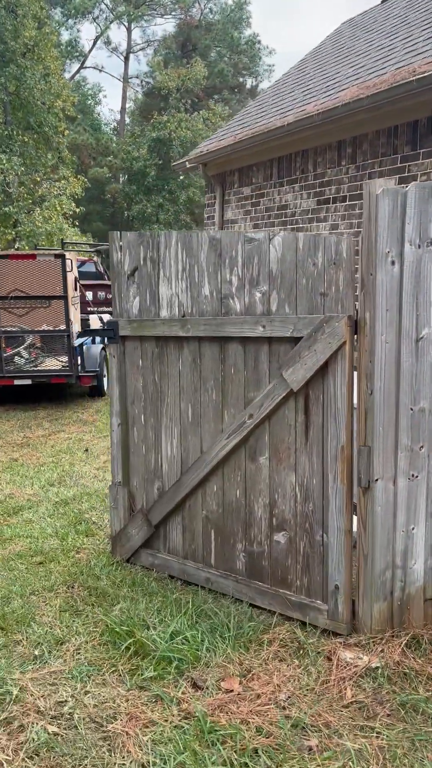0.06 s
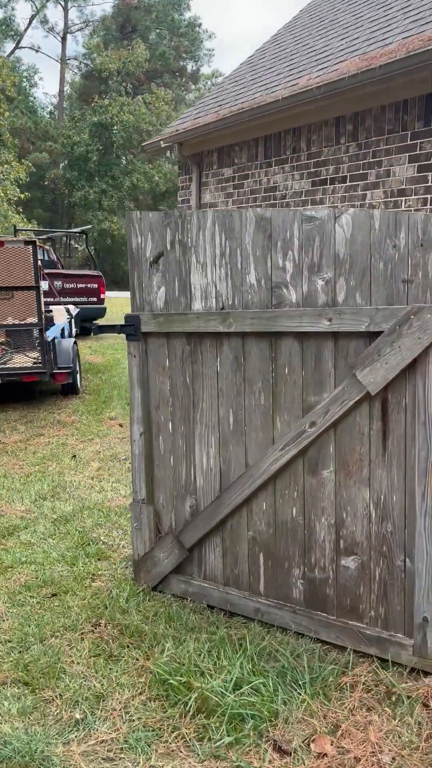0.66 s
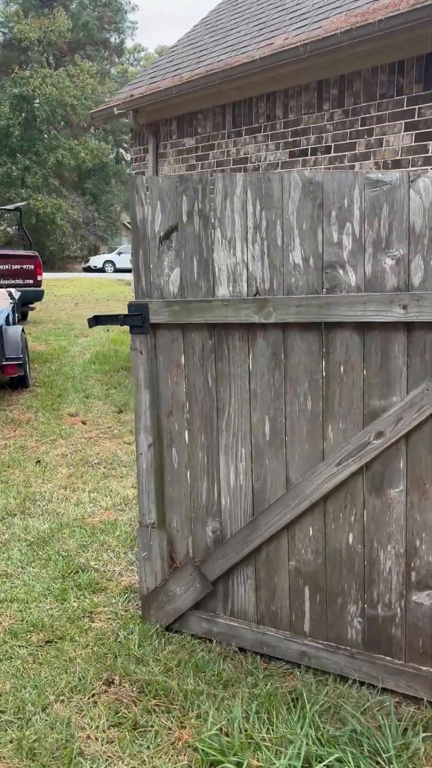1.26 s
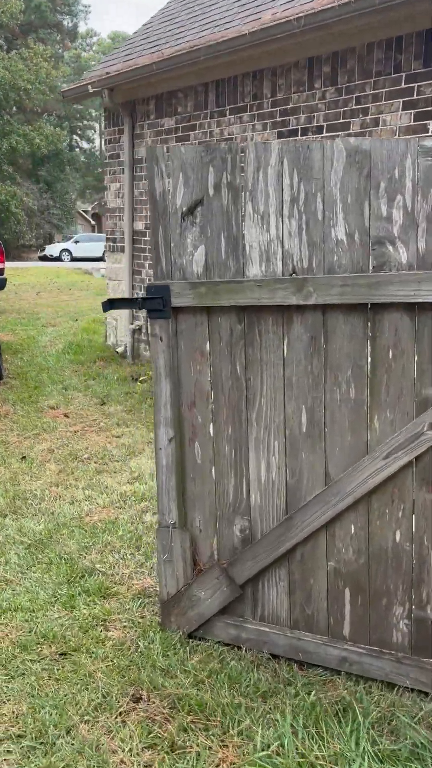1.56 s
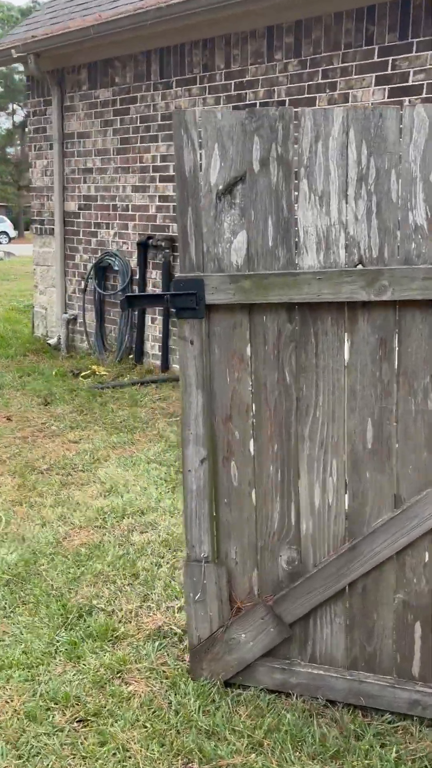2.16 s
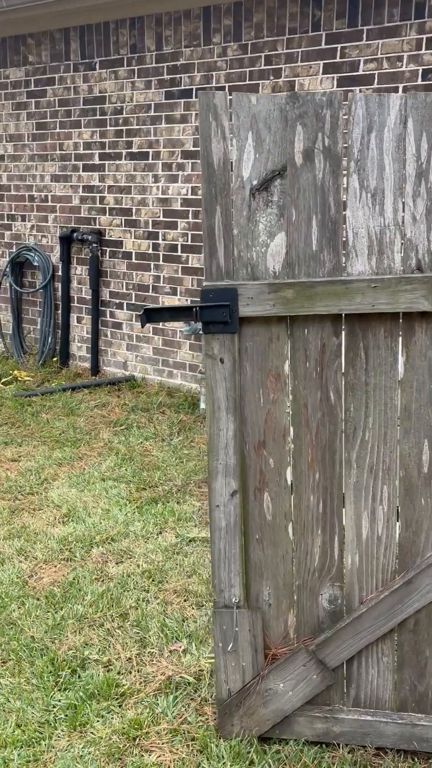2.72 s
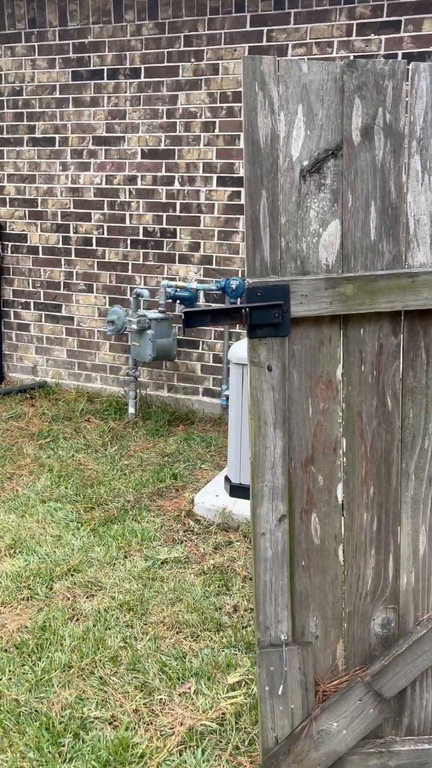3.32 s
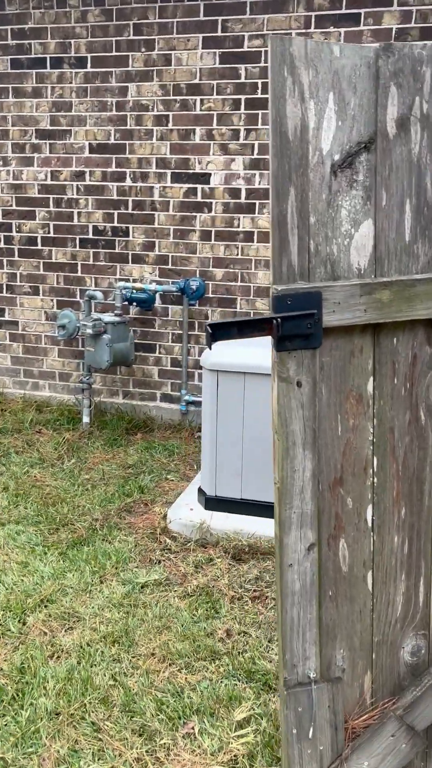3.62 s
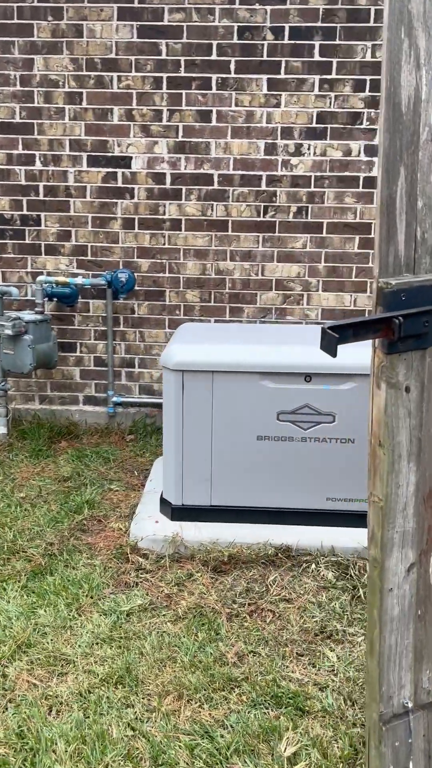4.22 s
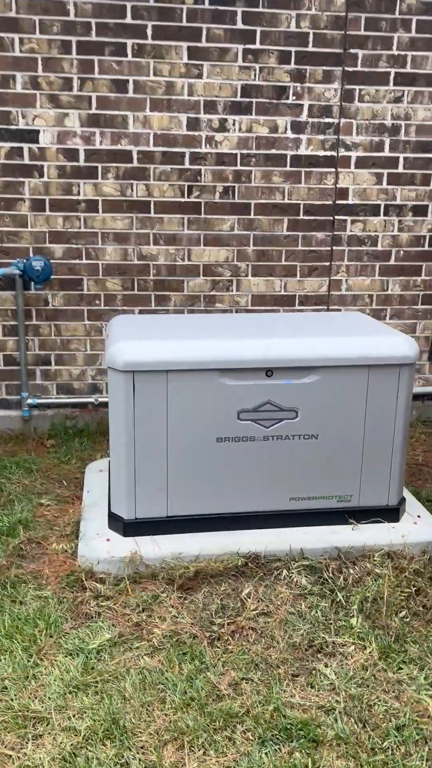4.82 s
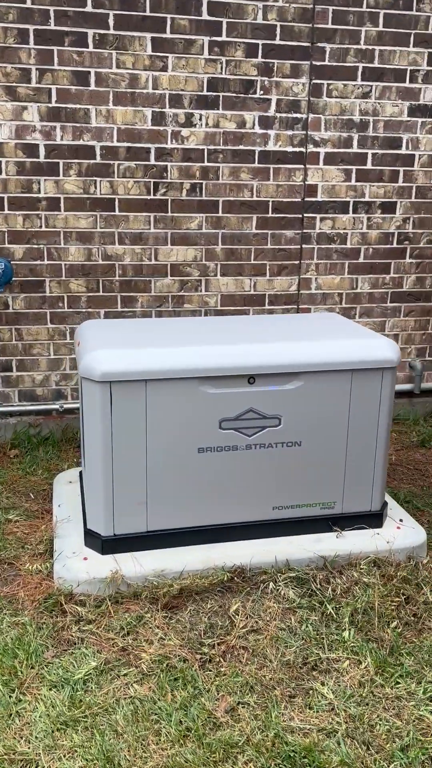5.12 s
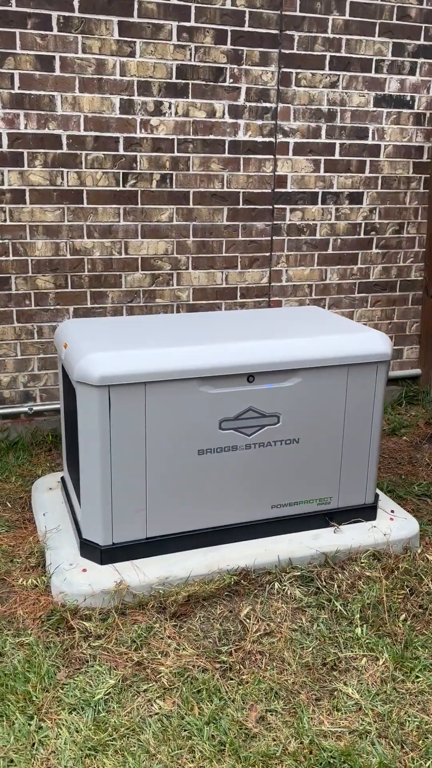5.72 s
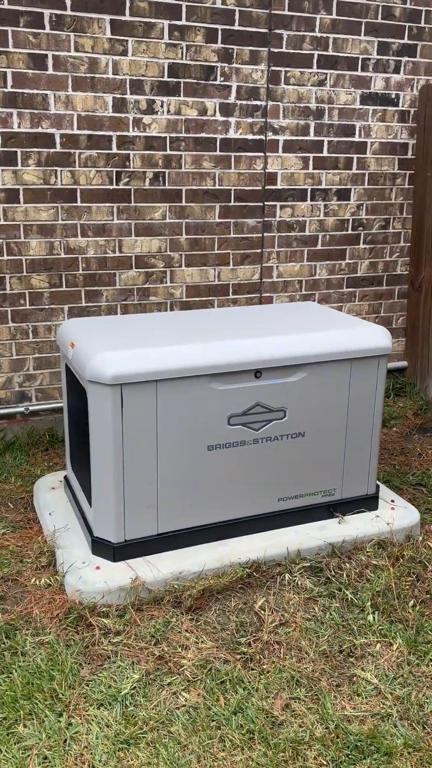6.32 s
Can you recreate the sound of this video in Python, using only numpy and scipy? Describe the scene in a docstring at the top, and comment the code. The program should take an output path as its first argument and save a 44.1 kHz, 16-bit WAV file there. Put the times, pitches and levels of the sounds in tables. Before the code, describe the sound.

A standby generator engine has just caught outdoors, about ten metres away, and flares with a rough bark in the first 0.3 seconds. It coasts down, dropping in pitch, and stumbles with a few dull thumps around 1 second before holding a slow, throbbing idle. The microphone moves toward it, with soft footsteps on grass at about 1.4 and 2 seconds, while a faint, high insect trill swells and fades. From about 3 seconds the pulsing fan rush, airy hiss, whirr and valve rattle grow over the low exhaust. A light rasp emerges around 4 seconds, and the engine stumbles again near 3.8, 4.3 and 5.2 seconds. From 4.4 seconds it climbs in pitch, with a growing whine and faint ticks from a steel panel at 4.6 and 5.5 seconds. It reaches running speed around 6 seconds and runs close by until the end, at 6.5 seconds.

```python
"""A V-twin standby generator has just caught: it flares up, coasts down to a slow idle with a few
stumbles, then climbs to its running speed. Its unevenly spaced firings make the exhaust throb and
pulse the rush of air; its valves rattle steel panels and its rotating parts whine. The listener walks
over grass round a wooden gate towards the housing, so the fan rush and the mechanical whirr grow over
the exhaust. Insects trill faintly."""
import sys
import numpy as np
from scipy.fft import rfft, irfft, next_fast_len
from scipy.io import wavfile
from scipy.ndimage import uniform_filter1d, minimum_filter1d, map_coordinates

SR = 44100
rng = np.random.default_rng(int(sys.argv[2]) if len(sys.argv) > 2 else 0)


def unload_wav(signal):
    """Save mono or channel-first audio to the path in sys.argv[1] as 16-bit WAV at rate SR, clipped to [-1, 1]."""
    wavfile.write(
        sys.argv[1],
        SR,
        np.round(np.clip(np.atleast_2d(signal).T, -1, 1) * 32767).astype(np.int16),
    )


N = 285327
TIME_S = np.arange(N) / SR

# four-stroke cycle rate: time_s, speed_hz
SPEED = [(0.0, 26.31), (0.18, 31.14), (0.45, 29.86), (0.65, 28.08), (1.08, 25.1), (1.55, 24.81),
         (2.45, 25.03), (3.7, 25.08), (4.32, 24.88), (4.75, 26.73), (5.05, 27.63), (5.35, 27.83),
         (5.75, 29.61), (6.1, 30.37), (6.47, 30.21)]
# how fully the cylinders fire, 0 (coasting) to 1: time_s, share
BURN = [(0, 0.37), (.17, 0.88), (.32, 0.24), (.85, 0.08), (1.05, 0.45), (1.6, 0.73), (2.5, 1)]
# the walk towards the housing: time_s, distance_m
DISTANCE = [(0, 10.7), (1.5, 7.9), (2.5, 6.7), (3.3, 4.76), (3.85, 3.87), (4.5, 2.97), (5.7, 2.07),
            (6.47, 2.02)]
# exhaust harmonics: order, coasting_db, firing_db, effort_gain_db, open_throttle_gain_db
EXHAUST_ORDERS = [(1, -44, -51, 11.5, 5), (2, -24, -21.5, 7.5, 3.5), (3, -14, -34, 2, 4),
                  (4, -36.5, -32, 6, -7), (5, -31.5, -17.5, 0, -2), (6, -38.5, -25.5, -1.5, 4),
                  (7, -34.5, -29, -5, -7), (8, -29, -20.5, -5, 0.5), (9, -32.5, -38, -12, -3),
                  (10, -45, -44, -2.5, -4), (11, -41, -42.5, -5.5, 6)]
# dip as pumping hands over to firing: centre_s, spread_s, gain_db
HANDOVER_DIP = (1, 0.14, -7.5)
# harmonics hollowed by that dip: order
HANDOVER_ORDERS = [5, 6, 7]
# spots where a wall's echo cancels one harmonic: centre_s, spread_s, gain_db
ECHO_NODES = [(4.21, 0.32, -19.5), (6.32, 0.25, -11.5)]
# resonances of the steel panels: pitch_hz, width_hz, gain_db
PANEL_MODES = [(1420, 200, 1), (2020, 140, -3), (3070, 95, -8), (3950, 130, -5.5), (4950, 300, -10.5)]
# closing of the four valves: phase_cycles
VALVE_CLOSINGS = [0, .21, .375, .585]
# beams of shaft-locked tones: order, level_db, centre_s, spread_s
WHINE_BEAMS = [(12, -40.5, 6.1, .6), (13, -36.5, 6, .9), (14, -44.5, 3.3, .7), (14, -41, 5.2, .5),
               (16, -45, .5, .6), (16, -38.5, 5.6, .9), (22, -47, .15, .2), (24, -54, .45, .2),
               (24, -42, 5.9, .8), (28, -49, 3.9, .6), (30, -50.5, 2.55, .17), (32, -45.5, 1.87, .9),
               (32, -41.5, 5.55, .5), (34, -47, 4.9, .4), (34, -41.5, 6, .4), (36, -54, 2.1, 1.1),
               (40, -45, 5.6, .25), (44, -56, 2.5, .5), (50, -47.5, 5.6, .7), (51, -56, 2.6, .5),
               (53, -44, 5.3, .22), (59, -52.5, 3.4, .9), (60, -47, 5.85, .2), (66, -48, .17, .1),
               (66, -52, 4, .35), (70, -56, 1.3, .17), (70, -54.5, 2.9, .8), (70, -48.5, 4.1, .55)]
# late burns: start_s, level_db, pitch_hz
STUMBLES = [(0.902, -13, 74), (.952, -14, 74), (1.029, -17, 80.5), (1.338, -13, 104), (1.603, -24, 115),
            (1.924, -39, 120), (2.258, -23, 125), (3.761, -14.5, 105), (3.775, -10.5, 74),
            (3.789, -23, 72.4), (3.802, -7, 74), (4.184, -21, 115), (4.32, -14, 74), (4.336, -8.5, 74),
            (4.357, -16, 74), (5.202, -16.5, 101), (5.213, -14, 80)]
# footfalls and grass rustle: start_s, level_db, t60_s, cutoff_hz
FOOTFALLS = [(1.442, -31, .022, 1300), (1.98, -46, 0.33, 11900), (1.991, -33.5, 0.094, 2700),
             (2.007, -31, 0.32, 750), (2.051, -26.5, 0.049, 684)]
# knocks of a loose panel: start_s, level_db
KNOCKS = [(4.592, -33), (5.546, -27)]

# noise spectra: frequency_hz, relative_density_db
BARK_SPECTRUM = [(110, -28), (165, -5), (205, 8), (240, 6), (280, -13), (380, -34), (700, -21), (1650, -35),
                 (2050, -36), (2600, -50), (13000, -37)]
MUFFLER_SPECTRUM = [(20, -52), (35, -32), (50, -13), (70, -2), (100, -2), (135, -3), (170, -1), (215, -2),
                    (270, -11), (400, -28), (900, -70)]
PUFF_SPECTRUM = [(100, -5.5), (220, 1.5), (300, -1), (400, -1.5), (500, -8), (650, -31), (1200, -39.5)]
HOUSING_SPECTRUM = [(300, -7), (520, -4), (720, 0.96), (950, -5), (1130, -6.5), (1450, -5.5), (1750, -11),
                    (2100, -10.5), (2600, -18), (3500, -19.5), (7000, -70)]
HISS_SPECTRUM = [(1200, -4), (2500, 4), (3300, 0.5), (4000, 1.5), (5000, -3), (6500, 0.5), (8500, -0.5),
                 (10500, -3), (13200, -1), (15500, 0.5)]
INSECT_SPECTRUM = [(6400, -50), (6850, -10), (7200, -40), (9000, -25), (9480, -9), (9650, 0), (9820, -11),
                   (10200, -45)]
VENT_SPECTRUM = [(1100, -35), (1400, -4), (1750, 0), (2100, -6), (2600, -35)]

# level laws: far_idle_db, nearness_db_per_db, effort_gain_db, open_throttle_gain_db
BURBLE_LAW = (-29.5, -0.11, -3, 0.5)
PUFF_LAW = (-37.5, 0.16, 5.5, 3)
HOUSING_LAW = (-46, 1.07, 4, 2.5)
HISS_LAW = (-51.5, 1.493, -0.4, 6)
WHIRR_LAW = (-48.5, 1, 3.5, 2)
RATTLE_LAW = (-59, 1.21, 5.5, 3)

# likeness of noise at the two microphone ports: frequency_hz, coherence
PORT_COHERENCE = [(60, 1), (300, .98), (850, .96), (1100, .75), (1600, .98), (3000, .6), (3900, .78),
                  (4900, .25), (5900, .95), (8000, .88), (15000, .88)]
# level difference of the ports: frequency_hz, left_minus_right_db
PORT_BALANCE = [(60, 1.4), (120, 2.4), (250, 3.3), (550, 4.5), (720, 3.5), (950, -.5), (1900, 0),
                (3600, -1.2), (7000, 0), (15000, 0)]
# phase difference of the ports: frequency_hz, left_lead_rad
PORT_PHASE = [(60, -.07), (200, -.2), (330, -.55), (520, -.65), (780, -1.2), (1080, -.35), (1350, -.45),
              (2100, .9), (2650, 2.2), (3500, 1), (5000, .6), (5900, 3.2), (8200, 6.3), (10800, 9.4),
              (13400, 12.6), (15800, 15.7)]

CRANK_START, SECOND_FIRING = .215, 3 / 8  # cycles
FIRING_LEAD, PUMPING_LAG, BARK_LAG = .09, .54, .785  # cycles: when each kind of pulse leaves the pipe
IDLE_HZ, EFFORT_SPAN_HZ = 25, 2.75  # effort levels off over this span above idle
THROTTLE_OPEN_S = .27  # until the governor closes the throttle
SETTLE_S, SETTLE_SPREAD_S = 1.01, .23  # power strokes take over from pumping
MUFFLER_HZ, MUFFLER_Q = 115.6, 5.8
NODE_ORDER = 8  # the harmonic that the echo cancels


def amp(db):
    """Decibels to amplitude ratio."""
    return 10 ** (np.asarray(db) / 20)


def unit(x):
    """Normalisation to rms 1."""
    return x / np.sqrt(np.mean(x ** 2) + 1e-20)


def along(points, hz):
    """Interpolation on a logarithmic frequency axis."""
    frequencies, values = np.transpose(points)
    return np.interp(np.log(hz + 1), np.log(frequencies + 1), values)


def curve(points):
    """Linear interpolation in time, one value a sample."""
    return np.interp(TIME_S, *np.transpose(points))


def lobe(centre_s, spread_s, order):
    """A bell-shaped envelope: 1 at its centre, half at one spread away."""
    return 1 / (1 + np.abs((TIME_S - centre_s) / spread_s) ** order)


def wobble(rate_hz):
    """Smooth random modulation: a spline through Gaussian knots."""
    coarse = np.linspace(0, N, 2048)
    knots = rng.standard_normal(1024)
    spline = map_coordinates(knots, [coarse * rate_hz / SR], mode="mirror")
    return np.interp(np.arange(N), coarse, spline)


def filtered(x, response):
    """Linear filtering: the spectrum times a complex frequency response."""
    size = next_fast_len(N + SR // 2)
    return irfft(rfft(x, size) * response(np.fft.rfftfreq(size, 1 / SR)), size)[..., :N]


def rush(spectrum):
    """Partial coherence: common and opposed noise mix into a stereo pair of rms 1."""
    def response(hz):
        angle = np.arccos(np.clip(along(PORT_COHERENCE, hz), 0, 1)) / 2
        return amp(along(spectrum, hz)) * [np.cos(angle), np.sin(angle)]
    mid, side = filtered(rng.standard_normal((2, N)), response)
    return unit(np.array([mid + side, mid - side]))


def strokes(cycle, depth, sharpness, first):
    """Amplitude modulation: a swell at each firing, the first of the pair weaker."""
    bump = lambda at: np.exp(sharpness * (np.cos(2 * np.pi * (cycle - at)) - 1))
    return unit(1 + depth * (first * bump(0) + bump(SECOND_FIRING)))


def firing_share(stumble_loss, spread_s):
    """Incomplete combustion: firing sags at each stumble, most at the hardest."""
    hardest_db = max(db for _, db, _ in STUMBLES)
    sags = [amp((db - hardest_db) / 2) * lobe(s, spread_s, order=4) for s, db, _ in STUMBLES]
    return np.clip(curve(BURN), 0, 1) * (1 - stumble_loss * np.max(sags, axis=0))


def exhaust(cycle, speed, effort, burn, throttle, flutter_db, weak_pulse, lag_rad):
    """Fourier series of a pulse pair: pistons pump, then a weak and a strong firing take over."""
    settled = .5 + .5 * np.tanh((TIME_S - SETTLE_S) / SETTLE_SPREAD_S)
    dip_s, dip_spread_s, dip_db = HANDOVER_DIP
    hollow_db = dip_db * lobe(dip_s, dip_spread_s, order=4)
    node_db = sum(db * lobe(s, spread_s, order=2) for s, spread_s, db in ECHO_NODES)
    out = np.zeros(N)
    for k, coasting_db, firing_db, effort_db, open_db in EXHAUST_ORDERS:
        db = coasting_db + burn * (firing_db - coasting_db) + effort * effort_db + throttle * open_db
        db += flutter_db * np.sqrt(k) * wobble(14)
        db += (k == NODE_ORDER) * node_db + (k in HANDOVER_ORDERS) * hollow_db
        second_pulse = np.exp(-2j * np.pi * k * SECOND_FIRING)
        tuning = k * speed / MUFFLER_HZ
        muffler_lag = np.arctan(MUFFLER_Q * (tuning - 1 / tuning))  # delays orders above resonance
        firing = np.angle(weak_pulse + second_pulse) + 2 * np.pi * k * FIRING_LEAD - muffler_lag - lag_rad
        pumping = np.angle(1 + weak_pulse * second_pulse) - 2 * np.pi * k * PUMPING_LAG
        shift = firing - pumping
        shift -= 2 * np.pi * np.round(shift[int(SETTLE_S * SR)] / (2 * np.pi))  # the short way round
        out += np.sqrt(2) * amp(db) * np.cos(2 * np.pi * k * cycle + pumping + settled * shift)
    return out


def chug(cycle, raggedness, even_db, ragged_db):
    """Cyclic variation: a random gain a cycle, since no two burns are alike, least of all half-firing."""
    strengths = rng.standard_normal(int(cycle[-1]) + 2)
    strength = np.interp(cycle, np.arange(len(strengths)), strengths)
    return amp((even_db + ragged_db * raggedness) * strength)


def bark(cycle, speed, throttle, rasp_db, ring_db, ring_hz, decay_s):
    """Impulse excitation: rough firings ring the pipe until the governor closes the throttle."""
    age = (cycle - BARK_LAG) % 1 / speed
    ring = unit(age / decay_s * np.exp(-age / decay_s) * np.sin(2 * np.pi * ring_hz * age))
    ring_fade = lobe(0, .67 * THROTTLE_OPEN_S, order=4)
    rasp = rush(BARK_SPECTRUM) * strokes(cycle - BARK_LAG, depth=1.4, sharpness=.46, first=.61)
    return amp(rasp_db) * throttle * rasp + amp(ring_db) * ring_fade * ring


def muffler_burble(cycle, burn):
    """Acoustic filtering: the muffler passes low noise, which grows with the share of firing."""
    return burn ** .2 * rush(MUFFLER_SPECTRUM) * strokes(cycle, depth=.11, sharpness=2.1, first=.7)


def exhaust_puffs(cycle):
    """Pulsating flow: each firing pushes out a puff of noise."""
    return rush(PUFF_SPECTRUM) * strokes(cycle, depth=.32, sharpness=3.7, first=.36)


def fan_rush(cycle):
    """Broadband flow noise: the housing's midrange rush lifts briefly at each firing."""
    return rush(HOUSING_SPECTRUM) * strokes(cycle, depth=.12, sharpness=19, first=.37)


def air_hiss(cycle):
    """Modulated flow noise: the treble of the cooling air flickers and pulses with the firings."""
    flicker = amp(.99 * wobble(18))
    return flicker * rush(HISS_SPECTRUM) * strokes(cycle, depth=.22, sharpness=5.1, first=.15)


def whirr(cycle, odd_db, fade_hz):
    """Multipath fading: harmonics of valve gear and crank come and go as their echoes mix."""
    usual_speed = np.mean(SPEED, axis=0)[1]
    out = np.zeros(N)
    for k in np.arange(12, 100):
        hz = k * usual_speed
        db = np.maximum(along(HOUSING_SPECTRUM, hz), along(PUFF_SPECTRUM, hz)) + odd_db * (k % 2)
        phase = 2 * np.pi * k * cycle
        out += amp(db) * (wobble(fade_hz) * np.sin(phase) + wobble(fade_hz) * np.cos(phase))
    return unit(out)


def valve_rattle(cycle, speed, clack_s, scatter_db, buzz):
    """Forced vibration: each closing valve clacks, harder or softer, and shakes the buzzing panels."""
    def steel(f):
        return sum((-1) ** k * amp(db) * 1j * f * width / (hz * hz - f * f + 1j * f * width)
                   for k, (hz, width, db) in enumerate(PANEL_MODES))
    drive = np.full(N, buzz)
    for closing in VALVE_CLOSINGS:
        strengths = amp(scatter_db * rng.standard_normal(int(cycle[-1]) + 2))
        age = (cycle - closing) % 1 / speed
        drive += strengths[(cycle + 1 - closing).astype(int)] * np.exp(-age / clack_s)
    white_noise = rush([(1000, 0)])
    return unit(filtered(drive * white_noise, steel))


def whine(cycle, waver_db, waver_rad):
    """Directivity: tones of fan, alternator and gears swell as the listener crosses their lobes."""
    out = np.zeros(N)
    for k in sorted({row[0] for row in WHINE_BEAMS}):
        beams = [amp(db) * lobe(s, spread_s, order=4)
                 for order, db, s, spread_s in WHINE_BEAMS if order == k]
        tone = np.sin(2 * np.pi * (k * cycle + rng.random()) + waver_rad * wobble(16))
        out += np.sqrt(2) * np.max(beams, axis=0) * amp(waver_db * wobble(9)) * tone
    return out


def insects(level_db, shimmer_db, passed_s, spread_s):
    """Narrowband noise: a thin, shimmering trill swells and fades as it is passed."""
    shimmer = amp(level_db + shimmer_db * wobble(24.6))
    return shimmer * lobe(passed_s, spread_s, order=2) * rush(INSECT_SPECTRUM)


def stumbles(decay_s, low_cut_hz):
    """Damped resonance: each late burn swells and dies as a thump in the muffler."""
    out = np.zeros(N)
    for start_s, db, ring_hz in STUMBLES:
        age = np.maximum(TIME_S - start_s, 0)
        envelope = age / decay_s * np.exp(1 - age / decay_s)
        out -= amp(db) * envelope * np.sin(2 * np.pi * ring_hz * age)
    return filtered(out, lambda hz: 1 - 1 / (1 + (hz / low_cut_hz) ** 6))


def footfalls():
    """Impact noise: soles land with a dull scuff and crush dry grass, in decaying bursts."""
    out = np.zeros(N)
    for start_s, db, t60_s, cutoff_hz in FOOTFALLS:
        age = np.maximum(TIME_S - start_s, 0)
        band = lambda hz: hz / (hz + cutoff_hz / 2) / (1 + (hz / cutoff_hz) ** 6)
        scuff = unit(filtered(rng.standard_normal(N), band))
        out += amp(db - 60 * age / t60_s) * (age > 0) * scuff
    return out


def vent_rasp(cycle, level_db, passed_s, spread_s):
    """Acoustic shadowing: a rasp from the housing's side emerges as the gate's edge is passed."""
    rasp = rush(VENT_SPECTRUM) * strokes(cycle, depth=.6, sharpness=5.5, first=.6)
    return amp(level_db) * lobe(passed_s, spread_s, order=4) * rasp


def panel_knocks(t60_s, low_cut_hz):
    """Free vibration: a loose panel knocks, and the hard contact favours its high modes."""
    out = np.zeros(N)
    for start_s, level_db in KNOCKS:
        age = np.maximum(TIME_S - start_s, 0)
        ring = sum(amp(db) / (1 + (low_cut_hz / hz) ** 6) * np.sin(2 * np.pi * hz * age)
                   for hz, _, db in PANEL_MODES)
        out += amp(level_db - 60 * age / t60_s) * ring
    return out


def scene():
    """Superposition: exhaust, machinery and air follow the crank; steps and insects join them."""
    speed, distance = curve(SPEED), curve(DISTANCE)
    cycle = CRANK_START + np.cumsum(speed) / SR + .00083 * wobble(12)
    effort = np.tanh((speed - IDLE_HZ) / EFFORT_SPAN_HZ)
    throttle = lobe(0, THROTTLE_OPEN_S, order=6)
    burn = firing_share(stumble_loss=.31, spread_s=.017)
    raggedness = np.sin(np.pi * burn)  # greatest when half-firing
    nearness_db = 20 * np.log10(distance[0] / distance)

    def level(far_db, growth, effort_db, open_db):
        """Level law: nearness, effort and throttle add in decibels."""
        return amp(far_db + growth * nearness_db + effort_db * effort + open_db * throttle)

    burble = level(*BURBLE_LAW) * muffler_burble(cycle, burn)
    puffs = level(*PUFF_LAW) * exhaust_puffs(cycle)
    gas = amp(2 * raggedness) * (burble + puffs)
    fan = level(*HOUSING_LAW) * fan_rush(cycle)
    vent = vent_rasp(cycle, level_db=-45.5, passed_s=3.98, spread_s=.39)
    hiss = level(*HISS_LAW) * air_hiss(cycle)
    gear = level(*WHIRR_LAW) * whirr(cycle, odd_db=-9, fade_hz=1.8)
    rattle = level(*RATTLE_LAW) * valve_rattle(cycle, speed, clack_s=.0034, scatter_db=3.5, buzz=.46)
    knocks = panel_knocks(t60_s=.12, low_cut_hz=3214)
    tones = whine(cycle, waver_db=2, waver_rad=.42)
    throb = exhaust(cycle, speed, effort, burn, throttle, flutter_db=.21, weak_pulse=.68, lag_rad=1.3)
    throb *= chug(cycle, raggedness, even_db=.25, ragged_db=2)
    thumps = stumbles(decay_s=.0066, low_cut_hz=40)
    flare = bark(cycle, speed, throttle, rasp_db=-23, ring_db=-17.5, ring_hz=227.5, decay_s=.0078)
    generator = throb + thumps + flare + gas + fan + vent + hiss + gear + rattle + knocks + tones
    return generator + footfalls() + insects(level_db=-60.5, shimmer_db=1.5, passed_s=1.55, spread_s=.85)


def record(dry):
    """Stereo pickup: two ports differ in level and phase; a limiter and a band limit follow."""
    half = np.array([[.5], [-.5]])  # each port takes half the difference
    response = lambda hz: amp(half * along(PORT_BALANCE, hz)) * np.exp(1j * half * along(PORT_PHASE, hz))
    fade_in = np.minimum(TIME_S / .008, 1)
    ports = filtered(dry * fade_in, response)
    safe_gain = np.minimum(1, .9 / (np.abs(ports).max(axis=0) + 1e-9))
    limiter_gain = uniform_filter1d(minimum_filter1d(safe_gain, size=801), size=801)
    return filtered(ports * limiter_gain, lambda hz: hz < 15750)


dry = scene()
out = record(dry)
unload_wav(out)
```